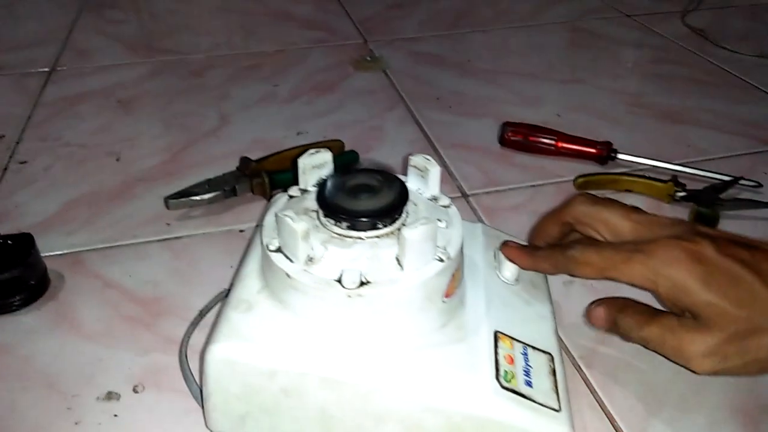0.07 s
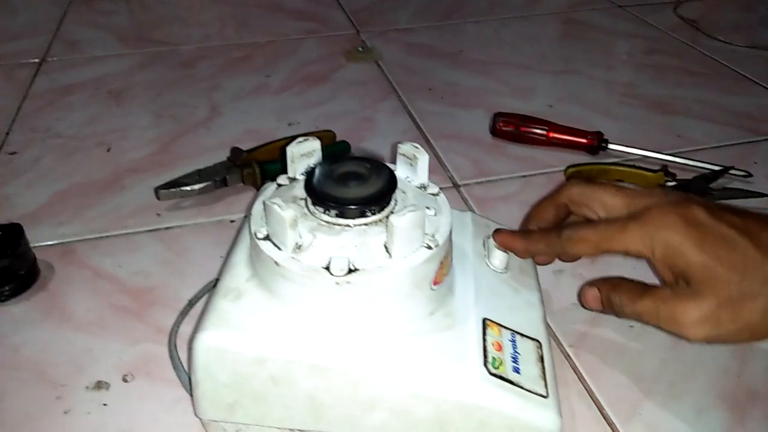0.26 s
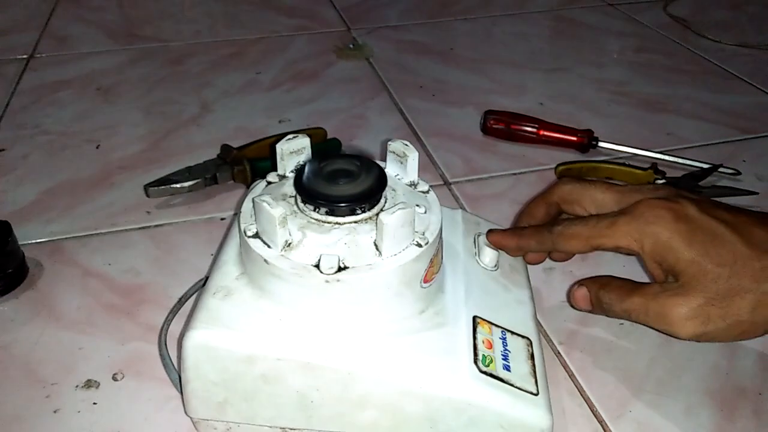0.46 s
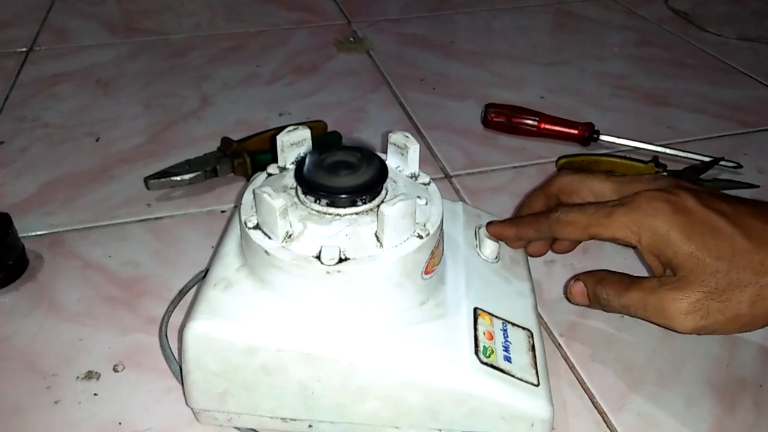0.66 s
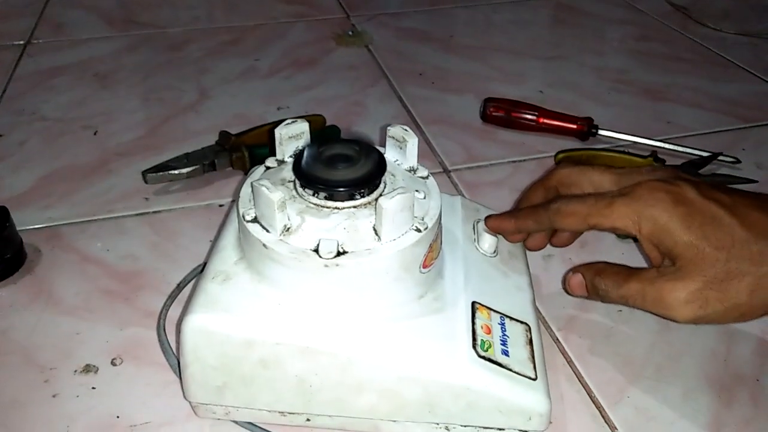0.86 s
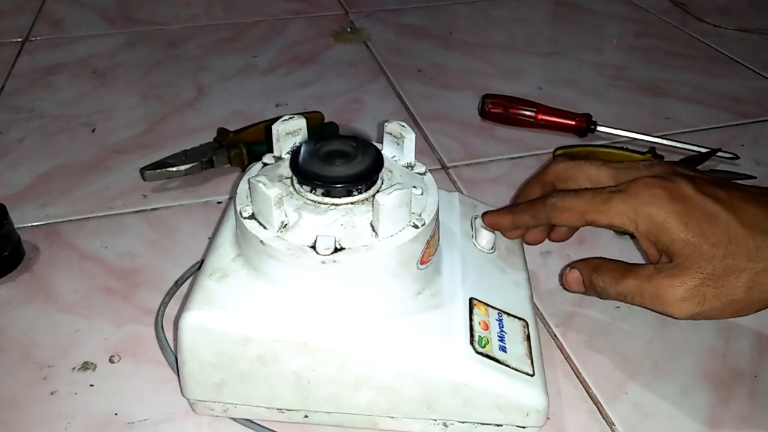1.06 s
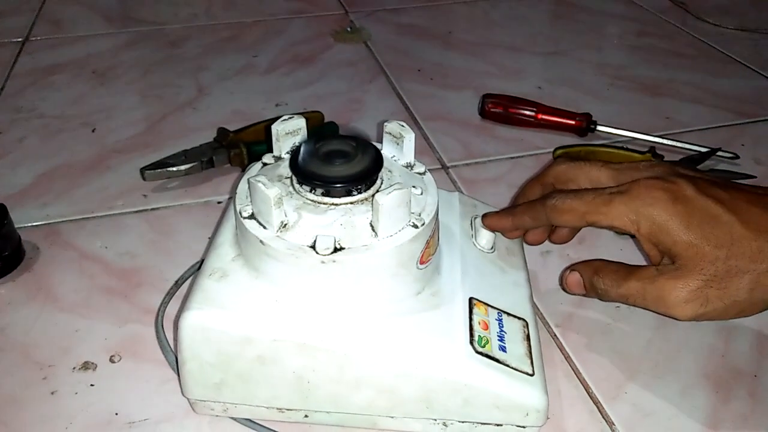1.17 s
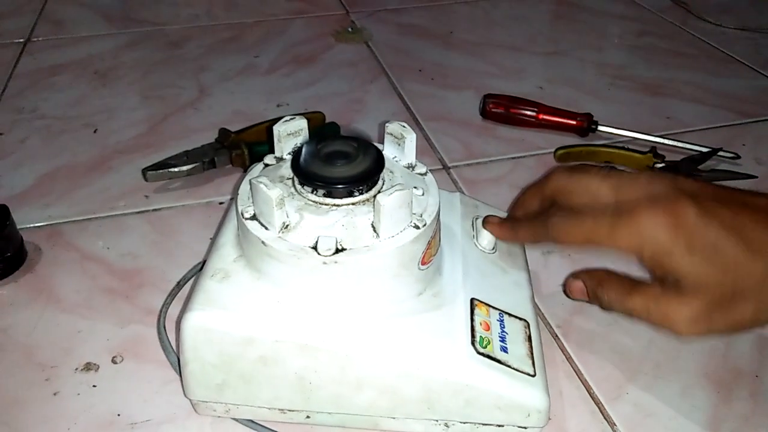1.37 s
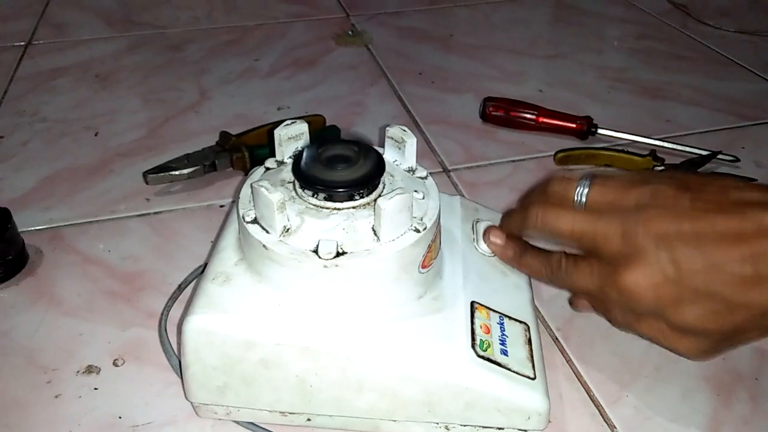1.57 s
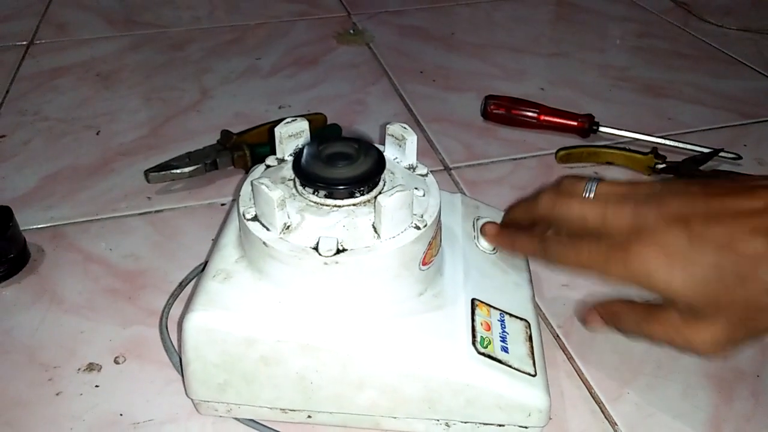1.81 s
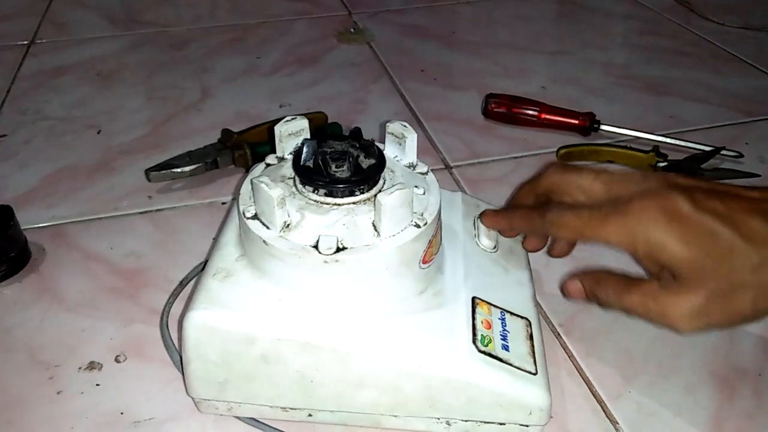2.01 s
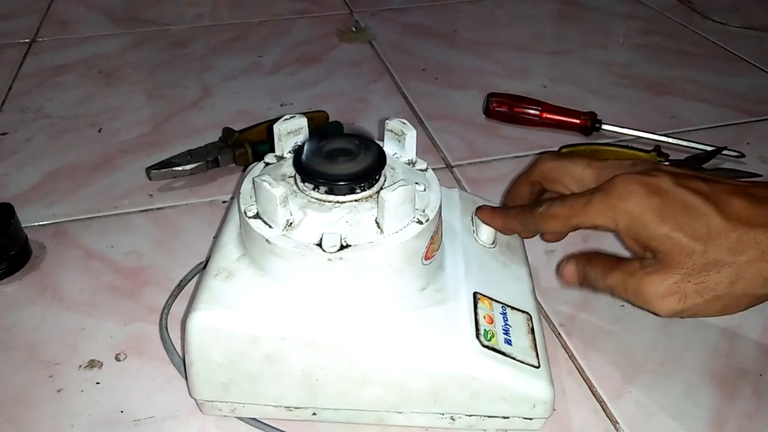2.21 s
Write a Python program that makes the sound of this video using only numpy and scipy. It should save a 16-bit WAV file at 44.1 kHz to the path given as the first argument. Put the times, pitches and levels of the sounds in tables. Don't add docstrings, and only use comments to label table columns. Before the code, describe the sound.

A small blender motor heard close in a hard tiled room: a soft finger thud and click, quick rise to a buzzing whine, steady running, another sharp click, then a rapid rattling coast down to rest.

```python
import sys
import numpy as np
from scipy import signal
from scipy.fft import rfft, irfft, next_fast_len
from scipy.io import wavfile
from scipy.ndimage import uniform_filter1d

SR = 44100
rng = np.random.default_rng(int(sys.argv[2]) if len(sys.argv) > 2 else 0)


def put_to_file(sound):
    columns = np.atleast_2d(sound).T
    safe = np.clip(columns, -1, 1)
    whole_steps = np.round(safe * 32767)
    wavfile.write(sys.argv[1], SR, whole_steps.astype(np.int16))


def ratio_of_db(decibels):
    return 10 ** (np.asarray(decibels, float) / 20)


N = 99225

ON_S, OFF_S, STOP_S = 0.2235, 1.818, 2.125
CRUISE_HZ, MAINS_HZ = 203.3, 100
STEP = 64
SPLIT_HZ = 3000

# t/s, f/Hz
SHAFT_SPEED = [(.235, 45), (.265, 73), (.297, 112), (.349, 147), (.424, 172.2), (.472, 180.6),
               (.563, 189.9), (.689, 196.8), (.841, 202.7), (1.1, 204.1), (1.3, 203.3), (1.52, 201.8),
               (1.56, 200.2), (1.821, 199.3), (1.92, 134), (2., 90), (2.07, 51), (2.115, 27)]
# t/s, whine level/dB, thump level/dB, rattle level/dB, hiss
# level/dB
LAYER_LEVELS = [(.235, -12, -19, -52, -34.5), (.265, -20, -20.5, -32, -35), (.297, -24, -23, -27, -26),
                (.36, -24, -23, -27.5, -27), (.43, -21.5, -28.5, -28.5, -25.5),
                (.563, -18.5, -39, -29, -26), (.689, -18, -36, -28.5, -32.5),
                (.841, -17, -33, -28.5, -30.5), (1.1, -16.5, -32, -37.5, -29.5),
                (1.26, -16.5, -56, -32.5, -31), (1.52, -17.5, -38, -29, -32),
                (1.56, -18.5, -40, -39, -32.5), (1.821, -25.5, -33.5, -43, -34),
                (1.9, -28.5, -29, -43.5, -35.5), (1.925, -33.5, -33, -30, -38), (1.995, -35, -33, -30, -41),
                (2.04, -40, -33.5, -40.5, -49.5), (2.115, -45.5, -38, -47, -58)]


def motor(t):
    times, *levels_db = np.array(LAYER_LEVELS, float).T
    waver = 1 + 0.0012 * slow_walk(14)
    hz = np.interp(t, *np.array(SHAFT_SPEED).T) * waver
    turns = np.cumsum(hz * (t > ON_S)) / SR
    powered = (t > ON_S) & (t < OFF_S)
    running = np.clip((t - ON_S) / 0.0014, 0, 1) * np.clip((STOP_S - t) / 0.011, 0, 1)
    thump, rattle = knocks(t, turns)
    layers = (whine(t, hz, turns, powered), thump, rattle, brushes(t, turns, powered))
    return running * sum(x * ratio_of_db(np.interp(t, times, db)) for x, db in zip(layers, levels_db))


# multiple of shaft speed, level/dB
SHAFT_MULTIPLES = [(1, -43), (2, -23), (3, 0), (4, -12), (5, -13), (6, -17), (7, -14), (8, -25), (9, -19),
                   (10, -23), (11, -26), (12, -25), (13, -34), (14, -29), (15, -41), (16, -41), (17, -42),
                   (18, -36), (19, -41), (20, -37), (21, -32), (22, -32), (23, -36), (24, -39), (25, -40),
                   (26, -35), (27, -33), (28, -36), (29, -28), (30, -24), (31, -29), (32, -34), (33, -35),
                   (34, -40), (35, -35), (36, -24), (37, -32), (38, -35), (39, -32), (40, -32), (41, -30),
                   (42, -30), (43, -30), (44, -25), (45, -28), (46, -26), (47, -24), (48, -10), (49, -22),
                   (50, -29), (51, -32), (52, -27), (53, -29), (54, -30), (55, -30), (56, -33), (57, -26),
                   (58, -31), (59, -34), (60, -31)]
# f/Hz, width/Hz, level/dB
HOUSING_MODES = [(483, 28.3, -2.5), (596.8, 56, 0), (721, 92, -5.5), (853, 43, -5), (1124, 81, -4),
                 (1500, 144, -12), (2167, 130, -10), (3410, 210, -24.5), (6000, 540, -12.5),
                 (7630, 420, -22.5), (8800, 810, -16.5), (9870, 470, -13), (11740, 600, -16.5),
                 (12950, 1100, -30.5)]


def whine(t, hz, turns, powered):
    drift_db, unsteady_db, swell_db = 5.5, 14, 5
    mains_depth, mains_max, slow_dull = 0.12, 0.5, 0.09
    count = len(SHAFT_MULTIPLES)
    phases = np.exp(2j * np.pi * rng.random((count, 2)))
    drifts = walk(9.55, count)
    slow_hz = hz[::STEP]
    speed = slow_hz / CRUISE_HZ
    turn = np.exp(2j * np.pi * turns)
    mains = powered * np.exp(2j * np.pi * MAINS_HZ * t)
    out = np.zeros(N)
    partial = np.ones(N, complex)
    for (k, db), (phase, mains_phase), drift in zip(SHAFT_MULTIPLES, phases, drifts):
        swell = np.abs(response(HOUSING_MODES, k * slow_hz) / response(HOUSING_MODES, k * CRUISE_HZ))
        body = np.minimum(swell, ratio_of_db(swell_db))
        spread_db = drift_db * min(k / 8, 1) + unsteady_db * np.abs(1 - speed)
        gain = body * speed ** (slow_dull * k) * ratio_of_db(db + spread_db * drift[:len(slow_hz)])
        throb = 1 + min(mains_depth * k / 2, mains_max) * (mains * mains_phase).real
        partial = partial * turn
        out += np.repeat(gain, STEP)[:N] * throb * (partial * phase).imag
    return np.sqrt(2) * out * np.where(powered, 1, ratio_of_db(-4.5))


# f/Hz, width/Hz, level/dB
COUPLING_MODES = [(3600, 500, -11.5), (6270, 390, -5.5), (8890, 1200, -4), (10110, 500, 2),
                  (11400, 770, -2), (13360, 1800, -8)]


def knocks(t, turns):
    thump_s, rattle_s, rough, scatter_db = 0.0036, 0.0013, 0.12, 1.5
    alike = 0.85
    drive_s, coast_s = 0.2735, 2.1065
    drive_turns = turns - np.interp(drive_s, t, turns)
    coast_turns = turns - np.interp(coast_s, t, turns)
    count = np.floor(np.where(t < OFF_S, drive_turns, coast_turns)).astype(int)
    thump_size, rattle_size = ratio_of_db(scatter_db * rng.standard_normal((N // STEP, 2)))[count].T

    sample = np.arange(N)
    strikes = np.diff(count, prepend=count[0]) == 1
    since = (sample - np.maximum.accumulate(strikes * sample)) / SR
    same_grit = rng.standard_normal(N)[np.rint(since * SR).astype(int)]
    grit = alike * same_grit + np.sqrt(1 - alike ** 2) * rng.standard_normal(N)

    blow = (since == 0) + rough * np.exp(-since / thump_s) * rng.standard_normal(N) / 4
    scrape = ((since / rattle_s) ** 2 * np.exp(-2 * since / rattle_s) + 0.04) * grit
    struck = HOUSING_MODES[:1] + HOUSING_MODES[2:]

    def thump_gain(f):
        return response(struck, f) * (1 - above(f, SPLIT_HZ)) / (1 + 1j * f / 1730) ** 2

    thump = shape(thump_size * blow * (t > ON_S), thump_gain)
    rattle = shape(rattle_size * scrape, lambda f: response(COUPLING_MODES, f) ** 2 * above(f, SPLIT_HZ))
    return unit(thump), unit(rattle)


# f/Hz, level/dB per Hz
BRUSH_HISS = [(300, -45.5), (450, -23), (1300, -22.5), (2200, -29), (3300, -43.5), (6000, -34.5),
              (9800, -33), (14500, -48.5)]


def brushes(t, turns, powered):
    flutter = 1 + 0.27 * np.cos(2 * np.pi * turns) + 0.14 * powered * np.cos(2 * np.pi * MAINS_HZ * t)
    return unit(shape(flutter * rng.standard_normal(N), lambda f: ratio_of_db(table(BRUSH_HISS, f))))


# t/s, level/dB, decay/s
FINGER = [
    (0.198, -50, .01),
    (0.2165, -26, .004),
]
# t/s, level/dB, bright ring level/dB, decay/s
SNAPS = [
    (0.2244, -8.5, -5, 0.0036),
    (1.8179, -8.5, 6.5, 0.0036),
]
# f/Hz, width/Hz, level/dB
SWITCH_MODES = [(1250, 270, 3.5), (1990, 390, 0), (3290, 1200, -11), (5780, 730, -0.5), (8800, 1200, -5),
                (10100, 800, -8), (12140, 400, -4)]


def switch(t):
    out = np.zeros(N)
    for start, db, decay in FINGER:
        swell = burst(t, start, decay) - burst(t, start, decay / 3)
        out += ratio_of_db(db) * swell * np.sin(2 * np.pi * 530 * (t - start))
    for start, db, bright_db, decay in SNAPS:
        def ring(f):
            return response(SWITCH_MODES, f) * (1 + (ratio_of_db(bright_db) - 1) * above(f, SPLIT_HZ))

        snap = shape(burst(t, start, decay) * rng.standard_normal(N), ring)
        out += ratio_of_db(db) * snap / np.abs(snap).max()
    return out


def room(t, near):
    t60_s, level_db = 0.3, -22
    echoes = rng.standard_normal(N) * burst(t, 0.0078, t60_s / np.log(1000))
    tail = shape(echoes, lambda f: 1 / (1 + 1j * f / 2200) ** 2)
    return ratio_of_db(level_db) * smear(near, tail)


# f/Hz, level/dB per Hz
HOUSE_NOISE = [(18, -30), (30, -2), (49, -12), (102, -15.5), (312, -33), (524, -24), (905, -17),
               (1830, -31), (15000, -53)]


def floor(t):
    hum_hz, hum_db, octave_db = 87, -72.5, -75.5
    hum_modes = [(hum_hz, 16, 0), (2 * hum_hz, 12, octave_db - hum_db)]
    rumble_modes = [(181, 24, -4), (308, 13, 0.5)]
    air = unit(shape(rng.standard_normal(N), lambda f: ratio_of_db(table(HOUSE_NOISE, f))))
    hum = unit(shape(rng.standard_normal(N), lambda f: response(hum_modes, f) ** 2))
    rumble = unit(shape(rng.standard_normal(N), lambda f: response(rumble_modes, f) * above(f, 140)))
    lift = uniform_filter1d(1. * (t > ON_S) * (t < OFF_S + 0.05), size=4000)
    fade = np.clip((STOP_S + 0.087 - t) / 0.5, 0, 1)
    shaking = uniform_filter1d(1. * (t > ON_S) * fade * (t < STOP_S), size=1000)
    return ratio_of_db(-68.5) * air + ratio_of_db(hum_db + 14.5 * lift) * hum + ratio_of_db(-55.5) * shaking * rumble


def treble_width(t, mid):
    level = ratio_of_db(-25 + 8 * slow_walk(12))
    spread = smear(mid, rng.standard_normal(N) * burst(t, 0, 0.002))
    return level * shape(spread, lambda f: above(f, 5500))


def table(points, hz):
    p = np.array(points, float)
    return np.interp(np.log(np.maximum(hz, 1)), np.log(p[:, 0]), p[:, 1])


def response(peaks, hz):
    total = 0
    for k, (f, width, db) in enumerate(peaks):
        detune = hz / f - f / np.maximum(hz, 1)
        total = total + (-1) ** k * ratio_of_db(db) / (1 + 1j * detune * f / width)
    return total


def above(hz, edge_hz, order=8):
    return 1 / (1 + np.minimum(edge_hz / np.maximum(hz, 1), 20) ** order)


def shape(x, gain):
    size = next_fast_len(2 * N)
    return irfft(rfft(x, size) * gain(np.arange(size // 2 + 1) * SR / size), size)[:N]


def smear(x, tail):
    return signal.fftconvolve(x, tail / np.sqrt(np.sum(tail ** 2)))[:N]


def unit(x):
    return x / np.sqrt(np.mean(x ** 2))


def walk(rate, count):
    k = int(SR / STEP / rate) + 2
    steps = rng.standard_normal((count, N // STEP + 1))
    return np.sqrt(0.72 * k) * uniform_filter1d(uniform_filter1d(steps, k), k)


def slow_walk(rate):
    return np.repeat(walk(rate, count=1), STEP)[:N]


def burst(t, start, decay):
    return (t >= start) * np.exp(-np.maximum(t - start, 0) / decay)


def scene():
    t = np.arange(N) / SR
    near = motor(t) + switch(t)
    near = near + room(t, near)
    heard = shape(near, lambda f: above(f, 350, order=14) * (1 - above(f, 14300, order=60)))
    mid = heard + floor(t)
    side = treble_width(t, mid)
    return np.array([mid + side, mid - side])


def low_pass(x):
    return signal.sosfilt(signal.butter(12, 15490, fs=SR, output="sos"), x)


def record(dry):
    return low_pass(dry)


dry = scene()
out = record(dry)
put_to_file(out)
```